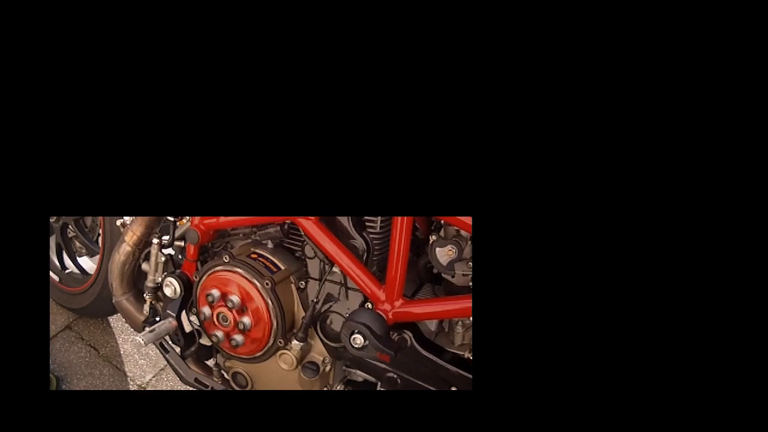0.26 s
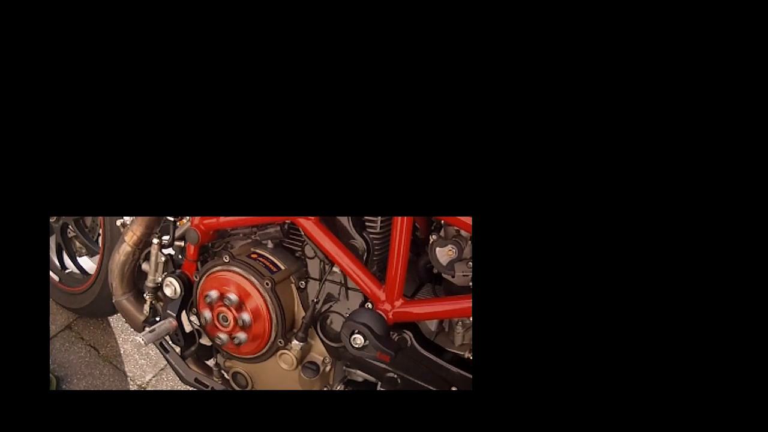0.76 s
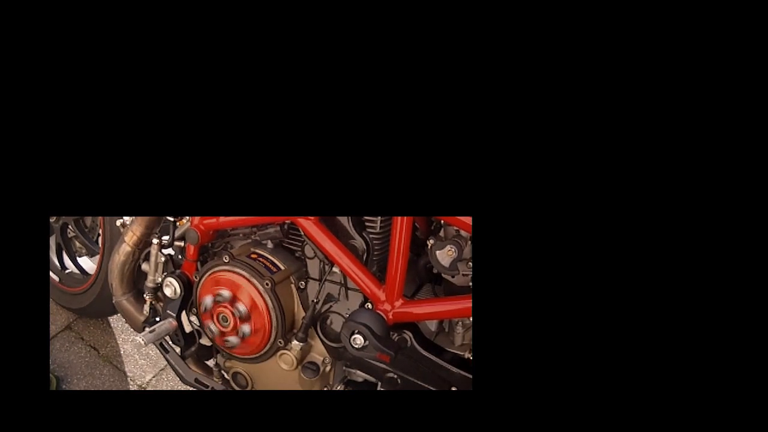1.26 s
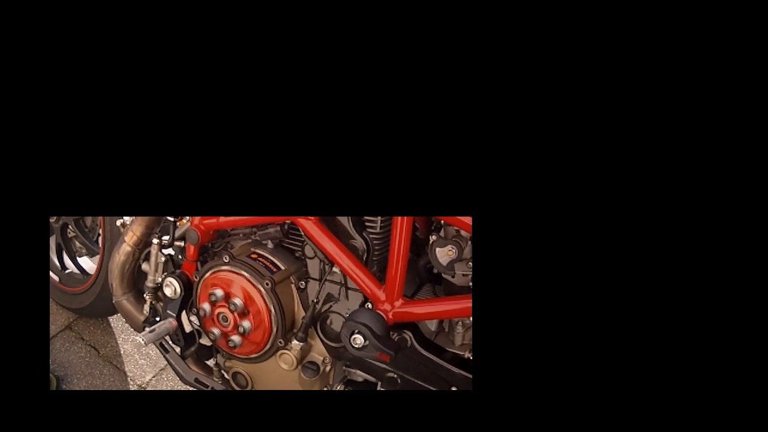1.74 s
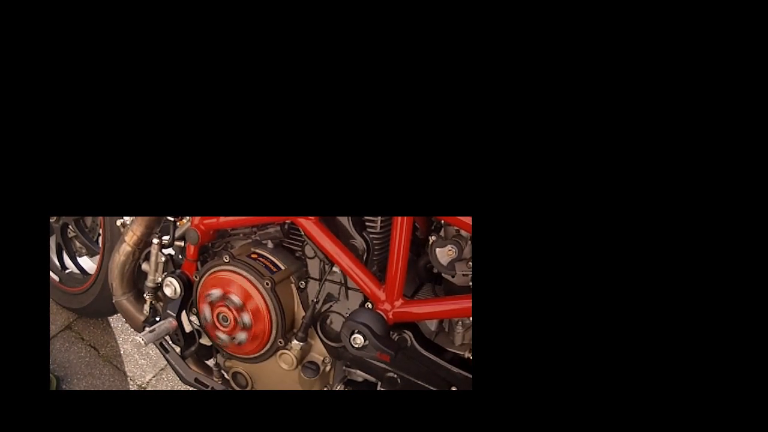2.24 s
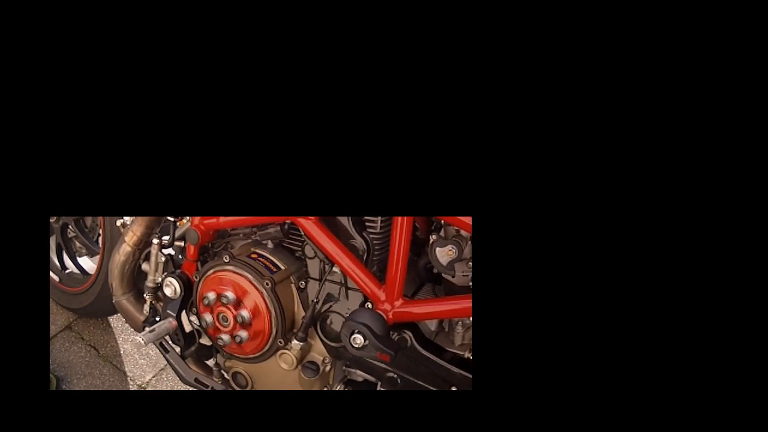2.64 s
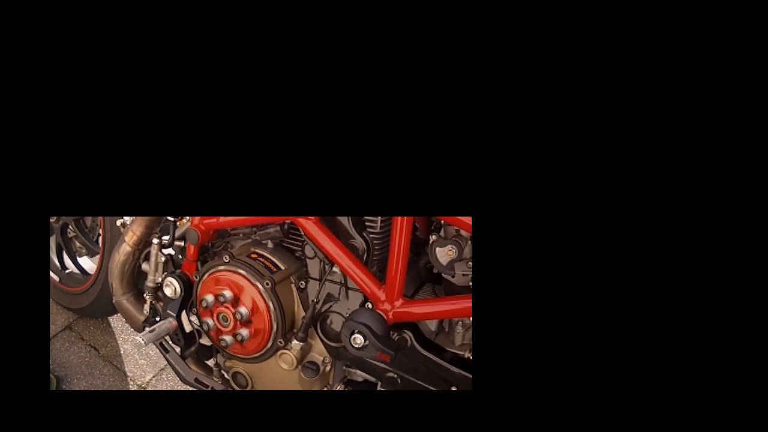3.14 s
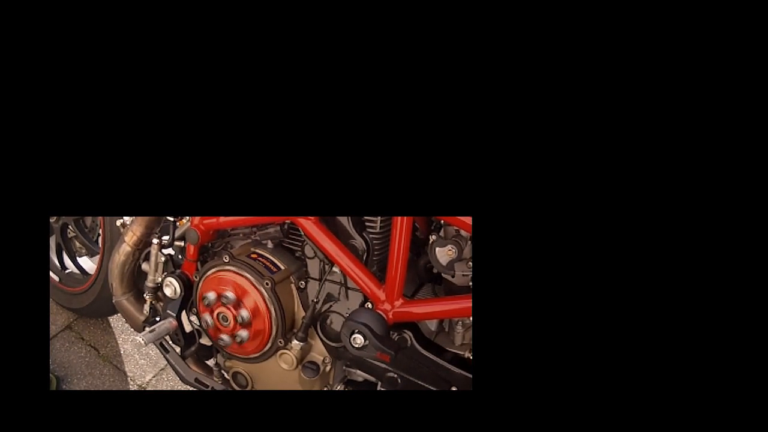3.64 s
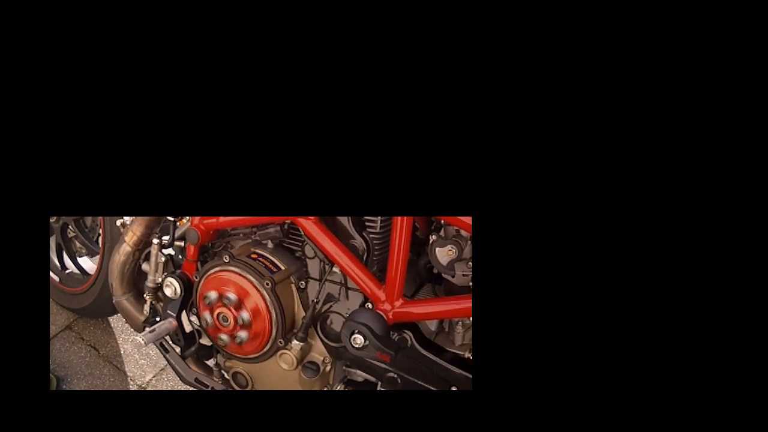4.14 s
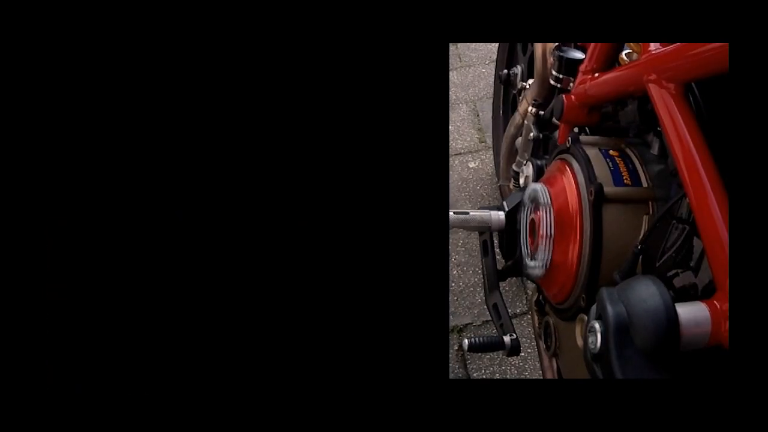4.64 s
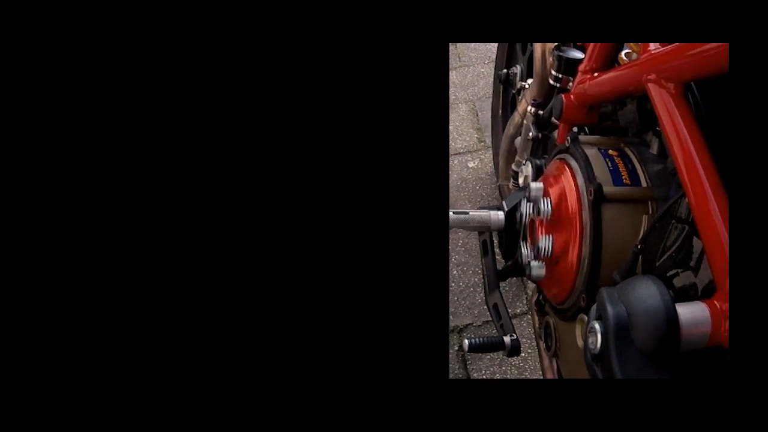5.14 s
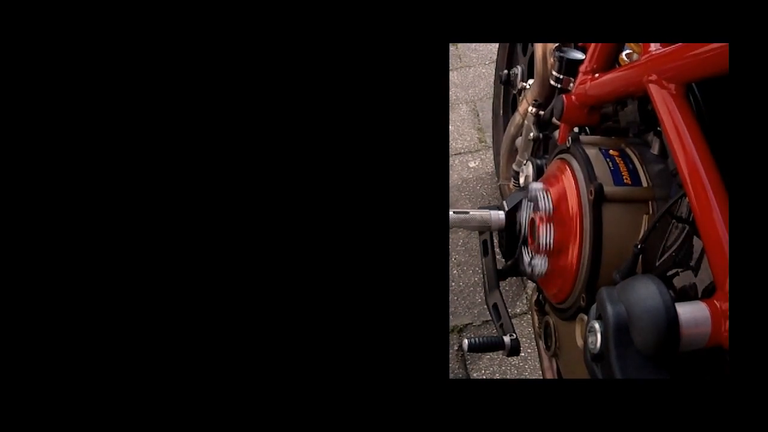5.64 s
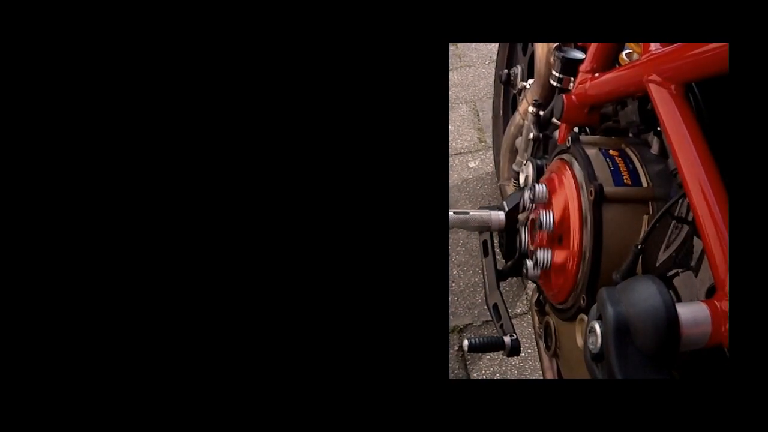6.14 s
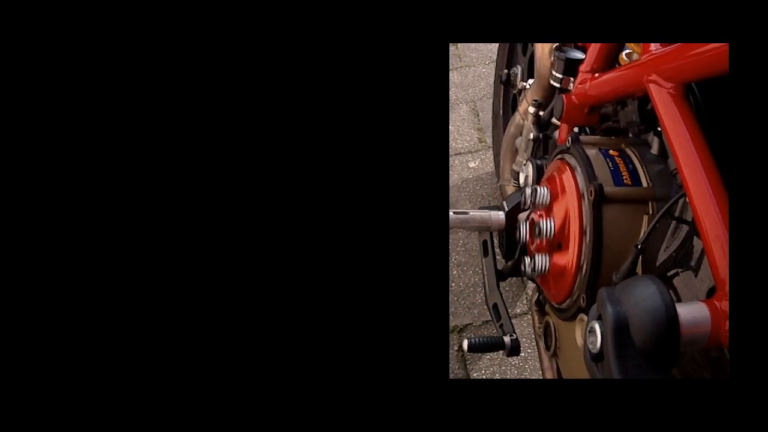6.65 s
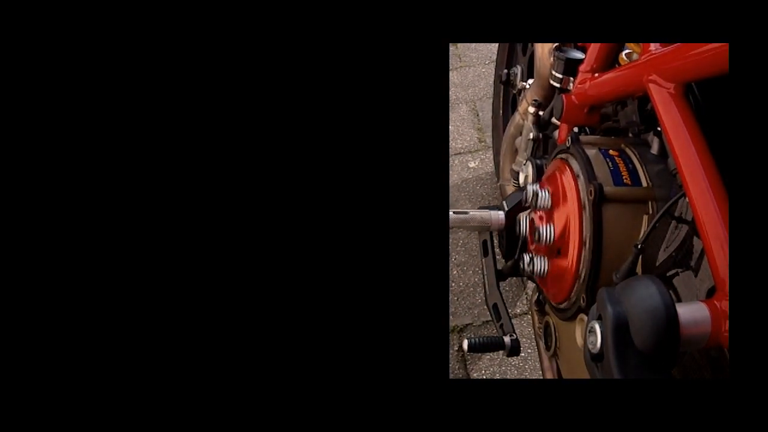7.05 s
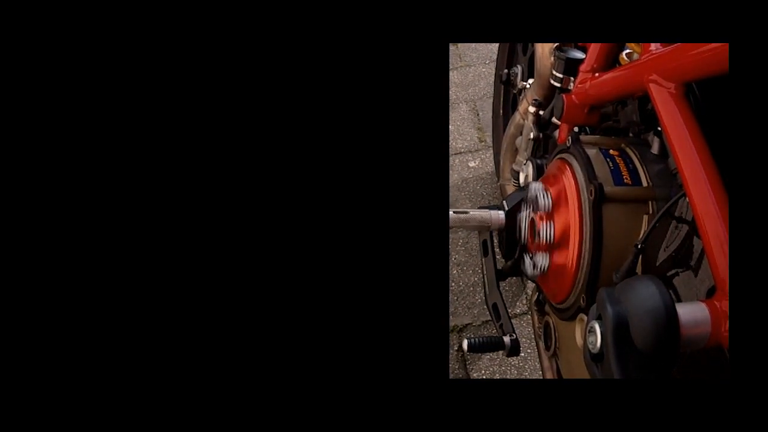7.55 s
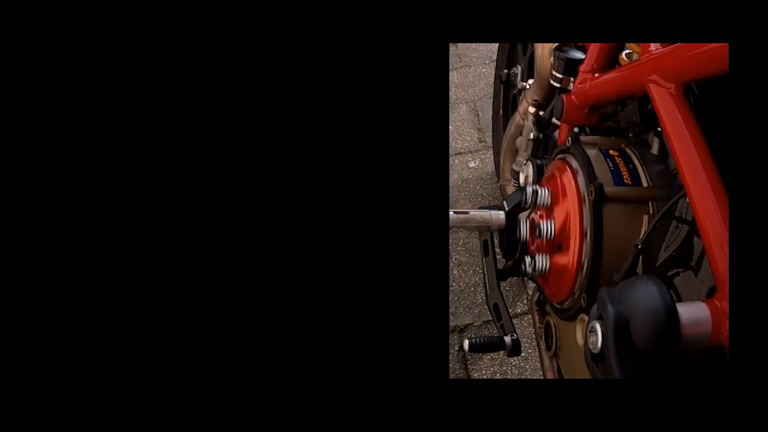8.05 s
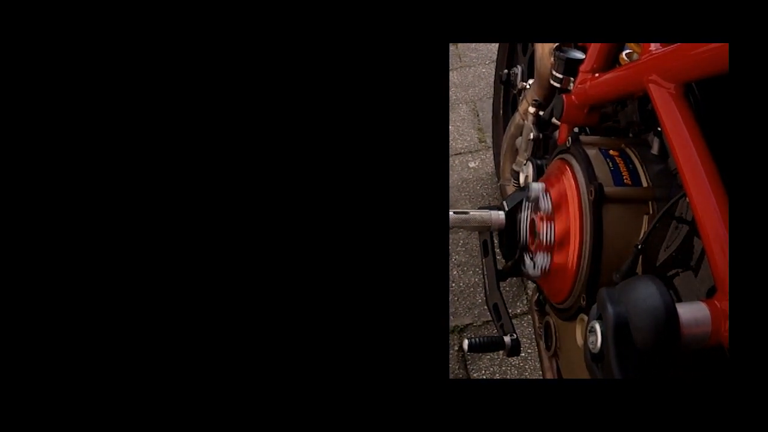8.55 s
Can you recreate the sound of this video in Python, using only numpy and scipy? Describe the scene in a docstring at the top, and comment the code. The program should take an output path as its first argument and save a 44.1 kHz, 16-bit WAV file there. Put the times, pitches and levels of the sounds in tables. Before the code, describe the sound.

A twin-cylinder motorcycle idles outdoors on paving, close to the microphone: low, lumpy exhaust pulses under a constant dry clutch rattle, steel plates clanking and ticking in irregular bursts. Short throttle blips peak near 0.8, 1.5 and 2.4 s, each climbing in about a third of a second to a hoarse bark with a gliding engine note, then falling quickly. Idle wavers around 2.7-3.4 s with faint exhaust pops. Blips return near 3.7, 4.1 and 4.7 s; at 4.44 s, during the rise, the sound cuts instantly to an edge-on position, with louder clatter and altered exhaust tone. Another rev peaks at 5.6 s, then uneven rattling idle until strong revs at 7.6 and 8.4 s, with hard metallic clacks and small pops around 7.8-8.0 s. The last rev runs down toward the end, near 8.8 s. Brief diffuse reflections surround everything.

```python
"""An air-cooled twin idles on paving and is blipped into short revs, its two uneven exhaust blows in each
four-stroke cycle exciting the resonances of pipe and silencer; partials of the cycle rate sing near each top.
The jerking crank throws loose dry-clutch plates against their basket: bursts of impacts on steel modes.
The clutch is heard facing, then, after an instant cut, edge-on; short scattered echoes surround gas and steel."""
import sys
import numpy as np
from scipy import signal
from scipy.fft import rfft, irfft, next_fast_len
from scipy.io import wavfile
from scipy.ndimage import uniform_filter1d

SR = 44100
rng = np.random.default_rng(int(sys.argv[2]) if len(sys.argv) > 2 else 0)


def decibels_to_gain(level_db):
    """Convert a level in decibels to a linear amplitude gain (20 dB per decade)."""
    exponent = np.asarray(level_db, float) / 20
    return 10 ** exponent


def pcm_store(signal):
    """Save signal as 16-bit PCM."""
    levels = np.round(np.clip(np.atleast_2d(signal), -1, 1) * 32767)
    wavfile.write(sys.argv[1], SR, levels.astype(np.int16).T)


N = 387638
T = np.arange(N) / SR
MOVE_S = 4.44  # instant cut from the place facing the clutch to the place edge-on
IDLE_CLATTER_DB = (-49.5, -44.5)  # relative level: facing, edge-on
# throttle blips of the crank speed; run_down_s is the time to fall to 1/e:
# opens_s, top_s, gained_rpm, run_down_s
BLIPS = [(.444, .768, 1328, .149), (1.169, 1.468, 1968, .182), (1.973, 2.385, 2029, .172),
         (3.423, 3.733, 1135, .1), (3.849, 4.136, 1838, .194), (4.358, 4.721, 2244, .294),
         (5.165, 5.558, 1807, .249), (7.392, 7.653, 1999, .189), (8.15, 8.43, 1560, .265)]


def spectrum_at(points, hz):
    """Interpolates a spectrum linearly against the logarithm of frequency."""
    f, value = np.transpose(points)
    return np.interp(np.log(hz + 1), np.log(f + 1), value)


def steady(x, size=6615):
    """Normalizes by the short-time rms, leaving a level near 1 all along."""
    power = uniform_filter1d(uniform_filter1d(x ** 2, size), size)
    return x / np.sqrt(abs(power) + 1e-18)


def ring(x, hz, width):
    """Damped resonance: a pole pair, scaled to pass noise at equal power whatever the bandwidth."""
    pole = np.exp((2j * np.pi * hz - np.pi * width) / SR)
    gain = np.sqrt(1 - abs(pole) ** 2) * pole.imag
    return signal.lfilter([0, gain], [1, -2 * pole.real, abs(pole) ** 2], x)


def glide(x, hz, width):
    """Resonance on a moving frequency: heterodynes down, damps with one pole, heterodynes back."""
    turn = np.exp(2j * np.pi * np.cumsum(hz) / SR)
    r = np.exp(-np.pi * width / SR)
    return (turn * signal.lfilter([np.sqrt(1 - r ** 2)], [1, -r], x / turn)).imag


def fade(x, ms):
    """Exponential relaxation: smears x into a tail with the given time constant."""
    return signal.lfilter([1], [1, -np.exp(-1000 / (ms * SR))], x)


def by_place(facing, edge_on):
    """Directivity: one value facing the clutch, the other edge-on."""
    return np.where(T < MOVE_S, facing, edge_on)


def blip(t, opens, top, down, late=1.17):
    """Rise and run-down: a power of a quarter sine up to 1, then half a Gaussian bell."""
    climb = np.sin(np.pi / 2 * np.clip((t - opens) / (top - opens), 0, 1)) ** late
    return np.where(t < top, climb, np.exp(-((t - top) / down) ** 2))


def rider():
    """Throttle control: each opening raises crank speed, bark and clatter; each closing starts an overrun."""
    # the idle hunts up and down: time_s, speed_rpm
    idle_speed = [(0, 1920), (.35, 1571), (1.1, 1635), (1.9, 1632), (2.75, 1855), (3.1, 1337), (3.3, 1498),
                  (3.45, 1266), (3.9, 1600), (5.2, 1438), (5.95, 1672), (6.4, 1381), (6.55, 1447),
                  (7.2, 1327), (7.35, 1388), (8.1, 1713), (8.79, 1502)]
    # added at the loudest of each blip; both "lasts" are multiples of its run-down:
    # bark_db, bark_lasts, throttle_shuts_s, clatter_db, clatter_lasts
    swells = [(12.31, 0.8, 0.725, 5.5, 0.16), (16.4, 1, 1.432, 8.5, 0.24), (16.6, 1.08, 2.366, 8.5, 0.27),
              (13, 1, 3.65, 5, 0.43), (16.6, 1.16, 4.08, 8.5, 0.67), (21, 1, 4.643, 10.5, 0.52),
              (20.71, 0.74, 5.53, 8.5, 0.58), (20.9, 1.02, 7.585, 6.5, 0.76), (22.6, 1.2, 8.3, 8.5, 2.2)]
    idle_bark_db = (-62, -65.5)  # facing, edge-on
    bark_lag_s = 0.045  # the bark is loudest just after the throttle shuts
    overrun_db, overrun_at, overrun_wide = -1.5, 0.74, 1  # the last two in run-downs
    t = np.arange(0, T[-1] + .001, .001)
    rpm = np.interp(t, *np.transpose(idle_speed))
    bark_db = clatter_db = coasting = 0
    for (opens, top, gained, down), swell in zip(BLIPS, swells):
        bark, bark_lasts, shuts, clatter, clatter_lasts = swell
        rpm = rpm + gained * blip(t, opens, top, down, late=2)
        heard = (top < MOVE_S) | (t >= MOVE_S)  # the second place cuts in with a blip's swell under way
        bark_db = bark_db + heard * bark * blip(t, opens, shuts + bark_lag_s, bark_lasts * down)
        clatter_db = clatter_db + heard * clatter * blip(t, opens, shuts, clatter_lasts * down, late=1.0)
        coasting = coasting + np.exp(-(((t - top) / down - overrun_at) / overrun_wide) ** 2)
    rpm, bark_db, clatter_db, coasting = (np.interp(T, t, c) for c in (rpm, bark_db, clatter_db, coasting))
    bark_db = by_place(*idle_bark_db) + bark_db
    # the plates quieten as the engine runs down
    clatter_db = by_place(*IDLE_CLATTER_DB) + clatter_db + overrun_db * coasting
    return rpm, bark_db, clatter_db, coasting


def exhaust_drive(cycles, rpm, coasting):
    """Pulsed flow: each opening valve sends a pressure blow and a gust of turbulent gas down the pipe."""
    # arrival of the blows (place in cycle, 0-1) and relative level at each microphone place:
    # facing_cycle, edge_on_cycle, facing_db, edge_on_db
    arrivals = [(.25, 0.2553, 3.5, 1), (.63, .74, -1, 0)]
    luck, late = rng.standard_normal((200, 2)), rng.random((200, 2))
    slowness = (1400 / rpm) ** 2
    blows = np.zeros(N)
    for k, (facing, edge_on, *place_db) in enumerate(arrivals):
        count = np.floor(cycles - by_place(facing, edge_on))
        at = np.flatnonzero(np.diff(count) > 0)
        cycle = count[at].astype(int) + 2
        # lean burns at idle and on the overrun differ most
        uneven_db = (1.8 + 1.6 * slowness[at] + 2.2 * coasting[at]) * luck[cycle, k]
        # up to 8 ms late at 1400 rpm, less at speed
        delay = (.008 * SR * slowness[at] ** .75 * late[cycle, k]).astype(int)
        blows[np.minimum(at + delay, N - 1)] = by_place(*decibels_to_gain(place_db))[at] * decibels_to_gain(uneven_db)
    blows = steady(fade(fade(blows, 0.016), 0.016))
    gusts = steady((steady(fade(blows, 13.0)) + .5) * rng.standard_normal(N))
    throttle = np.clip(uniform_filter1d(np.gradient(rpm) * SR, size=4000) / 6000, 0, 1)
    turbulence = np.maximum(np.maximum(.7 * throttle, .8 * slowness), .3 * coasting)
    return blows + decibels_to_gain(-10 + 10 * turbulence) * gusts


def pipe_bark(drive, rpm):
    """Pipe resonance: hot fast gas raises the modes' pitch with the engine's speed."""
    # pipe and ground as heard from each place; pitch at 1700 rpm, rise as a share per 1900 rpm:
    # pitch_hz, width_hz, facing_db, edge_on_db, rise_share
    pipe_modes = [(199.5, 11, -10, 7, 0.029), (142, 21, -37, 0, 0.11), (247, 117, 12, -29, 0.14),
                  (302, 29, 0, 12.5, 0.1), (333, 62, -9, 14, 0.2), (440, 170, -1, -7, 0.16),
                  (590, 140, -8.5, 4.5, 0.047), (776, 130, -40, -4, .05)]
    heat = (rpm - 1700) / 1900
    bark = 0
    for hz, width, *db, rise in pipe_modes:
        bark = bark + by_place(*decibels_to_gain(db)) * glide(drive, hz * (1 + rise * heat), width)
    return steady(signal.sosfilt(signal.butter(2, 110, "high", fs=SR, output="sos"), -bark))


def silencer_throb(drive, rpm):
    """Cavity and shell resonance: gas pulses and random shaking pass each low mode twice."""
    # width is that of each pass, level is relative: pitch_hz, width_hz, facing_db, edge_on_db
    silencer_modes = [(48, 55, -60.5, -64), (82, 15, -66.5, -69), (121, 25, -71, -67.5),
                      (152.7, 60, -69.5, -60)]
    shaken = steady(steady(drive) + 0.97 * rng.standard_normal(N))
    throb = 0
    for hz, width, *db in silencer_modes:
        twice = ring(ring(shaken, hz, width), hz, width)
        throb = throb + by_place(*decibels_to_gain(db)) * twice / np.sqrt(SR / width)
    return decibels_to_gain(13.5) * throb * (rpm / 1400) ** 0.12


def stray_pops():
    """Impulse response: unburnt gas going off in the pipe strikes one damped mode."""
    # time_s, peak_db
    pop_table = [(2.76, -42), (2.896, -41), (3.008, -46), (4.992, -40), (7.803, -37), (8.012, -36.5)]
    pitch_hz, width_hz = 303, 74
    pops = np.zeros(N)
    at = [round(s * SR) for s, _ in pop_table]
    pops[at] = decibels_to_gain([db for _, db in pop_table]) / np.sqrt(2 * np.pi * width_hz / SR)
    return ring(pops, pitch_hz, width_hz)


def exhaust(cycles, rpm, bark_db, coasting):
    """Source and filter: the pulsed gas flow is heard through pipe and silencer, with stray pops."""
    drive = exhaust_drive(cycles, rpm, coasting)
    return decibels_to_gain(bark_db) * pipe_bark(drive, rpm) + stray_pops() + silencer_throb(drive, rpm)


def firing_note(cycles, rpm):
    """Harmonic series: near a blip's top, wavering partials of the cycle rate glide with the crank."""
    # multiple_of_cycle_rate, level_db
    partials = [(5, 0), (6, 0), (8, 2), (10, -4), (12, 0), (14, 0), (16, -6), (20, 0), (22, -8)]
    # pitch_hz, level_db
    colour = [(100, -18), (140, -3), (200, -11), (305, 2), (450, -1), (600, -11)]
    # strength of the note in each blip, before the partials' own levels: level_db
    strengths = (-64, -57, -56, -64, -58, -51, -52, -54, -47)
    lasts_run_downs = (1, 1, 1, 1, 1, .9, .9, 1, 2.2)
    roughness, waver_s = .28, .03  # uneven burns make each partial waver
    t = T[::16]
    swell = 0
    for (opens, top, _, down), db, lasts in zip(BLIPS, strengths, lasts_run_downs):
        swell = swell + decibels_to_gain(db) * blip(t, opens, top + .04, lasts * down, late=3)
    span = max(int(waver_s * SR / 16), 1)
    out = 0
    for k, db in partials:
        waver = uniform_filter1d(uniform_filter1d(rng.standard_normal((2, len(t))), span), span)
        waver = 1 + roughness * (waver[0] + 1j * waver[1]) / waver.std()
        level = decibels_to_gain(db + spectrum_at(colour, k * rpm[::16] / 120))
        tone = np.exp(2j * np.pi * (k * cycles[::16] + rng.random()))
        out = out + level * (waver * tone).real
    return signal.resample_poly(swell * out, 16, 1)[:N]


def plate_impacts(cycles, rpm, clatter_db, coasting):
    """Impact excitation: a jerking crank throws the plates in bursts, which run together at speed."""
    # spread is that at 1400 rpm, level is relative: place_cycle, spread_cycle, level_db
    throws = [(0.93, 0.047, -5), (0.08, 0.082, -6), (0.31, 0.065, -6), (0.43, 0.042, -2.5),
              (0.6, 0.061, -6)]
    # hardest single clacks, level relative: time_s, level_db
    clack_table = [(0.158, -34), (0.1965, -34), (0.3006, -32.5), (0.3724, -39), (0.4549, -43),
                   (0.5646, -33), (0.6226, -34), (0.6697, -28.5), (0.7104, -27.5), (1.0071, -38),
                   (1.029, -30), (1.152, -36), (1.224, -27), (1.284, -33), (1.333, -27.5), (1.799, -31),
                   (1.905, -30.5), (1.9595, -35), (2.0267, -32.5), (2.0874, -33), (2.1415, -28.5),
                   (2.2658, -29.5), (2.7067, -34.5), (2.734, -30.5), (2.99, -37), (3.0642, -41),
                   (3.161, -32.5), (3.249, -36), (3.436, -35), (3.499, -36.5), (3.576, -31), (3.6316, -31),
                   (3.676, -33), (3.912, -31.5), (3.9564, -30.5), (4.0466, -30), (4.387, -34),
                   (4.4373, -32), (4.4563, -29), (4.5073, -31), (4.547, -33), (4.8967, -31), (5.0592, -41),
                   (5.117, -30), (5.1613, -28), (5.2993, -28), (5.3574, -33), (5.401, -24), (5.439, -22),
                   (5.915, -26.5), (6.078, -27), (6.155, -31), (6.2034, -33), (6.3609, -46), (6.402, -43),
                   (6.488, -34), (6.539, -29.5), (6.565, -32), (6.614, -33.5), (6.706, -34), (6.878, -28.5),
                   (6.9926, -43), (7.233, -39), (7.309, -37), (7.3937, -30), (7.437, -30), (7.4802, -24),
                   (7.5306, -27), (7.571, -21.5), (7.6057, -27), (7.9619, -25.5), (8.0998, -27.5),
                   (8.1708, -30), (8.2318, -22), (8.276, -23), (8.308, -23), (8.425, -26)]
    luck = rng.standard_normal((200, len(throws)))
    shake = np.zeros(N)
    for k, (place, spread, db) in enumerate(throws):
        turn = np.round(cycles - place)
        off = (cycles - place - turn) / (spread * (rpm / 1400) ** 1.3)
        shake += decibels_to_gain(db + 1.63 * luck[turn.astype(int) + 2, k]) * np.exp(-.5 * off ** 2)
    # speed and overrun even out the bursts
    shake = decibels_to_gain(clatter_db + 4) * steady(shake + 0.06 * (rpm / 1400) ** 1.9 + 0.29 * coasting)
    s, db = np.transpose(clack_table)
    clacks = np.zeros(N)
    clacks[(s * SR).astype(int)] = decibels_to_gain(db)
    # the plates fly free, and fall quiet, just before a hard clack
    flight = round(2 * 0.0062 * SR)
    lift = np.convolve(clacks > 0, np.hanning(flight))[flight - 1:][:N]
    shake *= 1 - np.clip(0.3 * lift, 0, .95)
    # the whole stack of plates lands within a few ms
    landing = signal.windows.gaussian(1001, 0.0026 * SR)
    shake += decibels_to_gain(-6.5) * signal.oaconvolve(clacks, landing)[400:][:N]
    size = decibels_to_gain(2.8 * np.minimum(rng.exponential(1, N), 2.5))
    size = size * (rng.random(N) < 2600 / SR)  # some 2600 impacts a second
    hits = shake * size / size.std() + decibels_to_gain(-6.0) * clacks
    return shake, hits


def steel_rings(hits):
    """Modal synthesis: each impact excites the modes of plates, basket and cases in its own proportion."""
    # bands of close modes: pitch_hz, width_hz, facing_db, edge_on_db
    steel_bands = [(615, 117, -4, -4), (1356, 84, -9.5, -9.5), (1610, 105, -17, -6),
                   (1904, 77, -5.5, -11.5), (2195, 184, -2.5, -2), (2536, 104, -5.5, -3),
                   (2892, 80, -9, -5), (2800, 280, -36, -11.5), (4034, 400, 1, -3), (4260, 290, -3, -9),
                   (5694, 78, -6, -8), (5877, 210, -36, -1.5), (5920, 490, -3, -17.5),
                   (8416, 160, -39, -6.5), (8930, 590, -6, -17), (8840, 290, -9.5, -3.5)]
    at = np.flatnonzero(hits)
    rings = np.zeros(N)
    for hz, width, *db in steel_bands:
        # each clank favours other plates
        favour = np.minimum(rng.standard_normal(N // 350 + 2), 1)
        favour_db = 5.0 * np.interp(at, np.arange(0, N + 350, 350), favour)
        for shift in (-.4, .35):  # unlike plates split each band into close modes
            struck = np.zeros(N)
            # every impact lands elsewhere
            struck[at] = decibels_to_gain(favour_db) * hits[at] * rng.uniform(-1.004, 1, len(at))
            rings += by_place(*decibels_to_gain(db)) * ring(struck, hz + shift * width, .92 * width)
    return decibels_to_gain(-9.5) * rings


def dry_ticks(hits, shake):
    """Broadband contact noise: short coloured bursts, with more treble the harder the clatter."""
    # spectrum heard facing the clutch: pitch_hz, level_db
    colour_facing = [(470, -67), (800, -12), (1040, -29), (2570, 1.5), (5830, -6), (6930, -9.5),
                     (8740, -6.5), (11300, -11), (12300, -20), (15000, -75)]
    # spectrum heard edge-on: pitch_hz, level_db
    colour_edge_on = [(470, -48), (800, 0), (1040, -26), (2860, 8), (4850, -34), (5830, -42), (7100, -10.5),
                      (8740, -32), (11600, -13.5), (15000, -53)]
    length = next_fast_len(N, True)
    burst = rfft(np.sqrt(fade(hits ** 2, 1.24)) * rng.standard_normal(N), length)
    hz = np.fft.rfftfreq(length, 1 / SR)
    facing = irfft(burst * decibels_to_gain(spectrum_at(colour_facing, hz)), length)[:N]
    edge_on = irfft(burst * decibels_to_gain(spectrum_at(colour_edge_on, hz)), length)[:N]
    ticks = by_place(decibels_to_gain(-19.0) * facing, decibels_to_gain(-23.0) * edge_on)
    treble = signal.sosfilt(signal.butter(2, 10500, "high", fs=SR, output="sos"), ticks)
    idle_power = decibels_to_gain(2 * by_place(*IDLE_CLATTER_DB))
    force_db = 10 * np.log10(uniform_filter1d(shake ** 2, size=1300) / idle_power + 1e-9) - 6
    bright_db_per_db = .9
    return ticks + (decibels_to_gain(bright_db_per_db * np.clip(force_db, -15, 12)) - 1) * treble


def clutch(cycles, rpm, clatter_db, coasting):
    """Struck solid: plates slapping the basket give both ringing modes and dry contact noise."""
    shake, hits = plate_impacts(cycles, rpm, clatter_db, coasting)
    return steel_rings(hits) + dry_ticks(hits, shake)


def paving(x, count=4):
    """Diffuse reflection off stones, frame and walls, crossfading between several random tails."""
    t = np.arange(.004, .3, 1 / SR)
    out = 0
    for k in range(count):
        tail = rng.standard_normal(len(t)) * decibels_to_gain(-60 * t / .2)  # 60 dB down in 0.2 s
        echo = np.r_[np.zeros(176), tail / np.linalg.norm(tail)]  # starts after 4 ms
        share = np.maximum(np.cos(2 * np.pi * (1.7 * T + k / count)), 0)
        out = out + signal.oaconvolve(share * x, echo)[:N]
    return out


def scene():
    """Superposition of engine and echoes; the pipe mouth points away from the walls."""
    rpm, bark_db, clatter_db, coasting = rider()
    cycles = -0.075 + np.cumsum(rpm / 120) / SR  # two crank turns to a cycle
    gas = exhaust(cycles, rpm, bark_db, coasting) + firing_note(cycles, rpm)
    steel = clutch(cycles, rpm, clatter_db, coasting)
    return (gas + steel + paving(decibels_to_gain(-8.5) * gas + decibels_to_gain(-4.5) * steel))[None]


def low_pass(x):
    """Removes everything above the highest recorded frequency."""
    return signal.sosfilt(signal.butter(12, 15400, fs=SR, output="sos"), x)


def record(dry):
    """High-pass response: the microphone drops the deepest bass, below 40 Hz."""
    thin = signal.sosfilt(signal.butter(4, 40, "high", fs=SR, output="sos"), dry)
    return low_pass(thin)


dry = scene()
out = record(dry)
pcm_store(out)
```